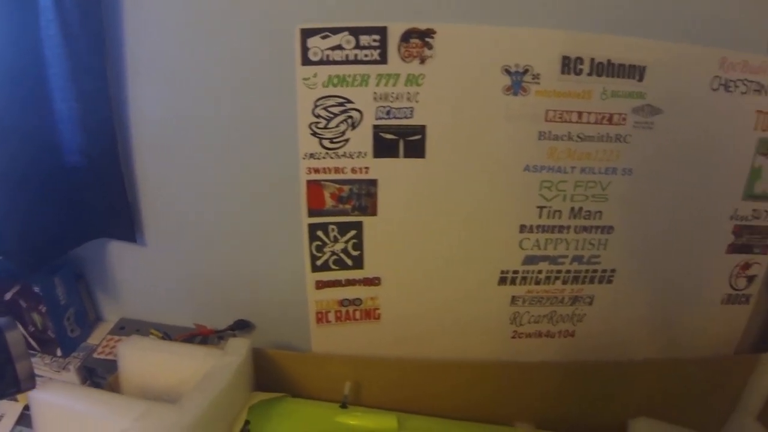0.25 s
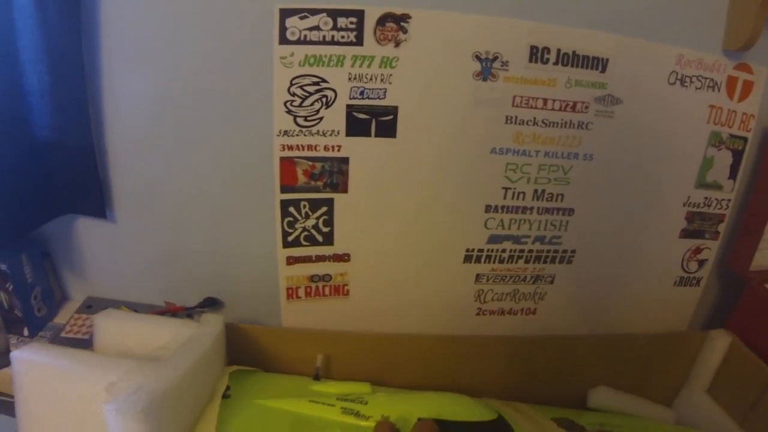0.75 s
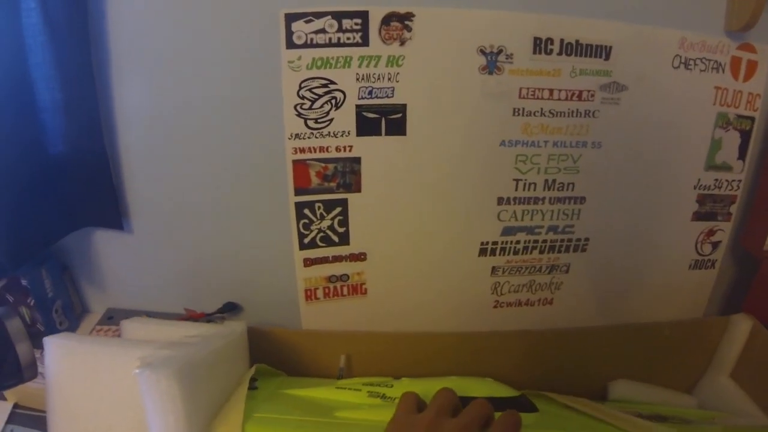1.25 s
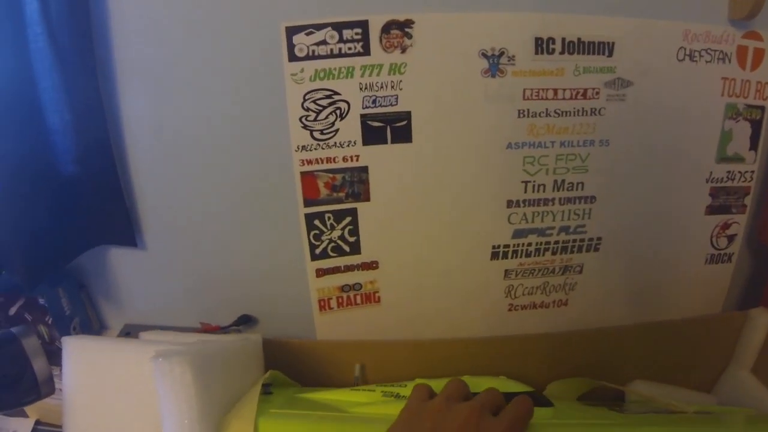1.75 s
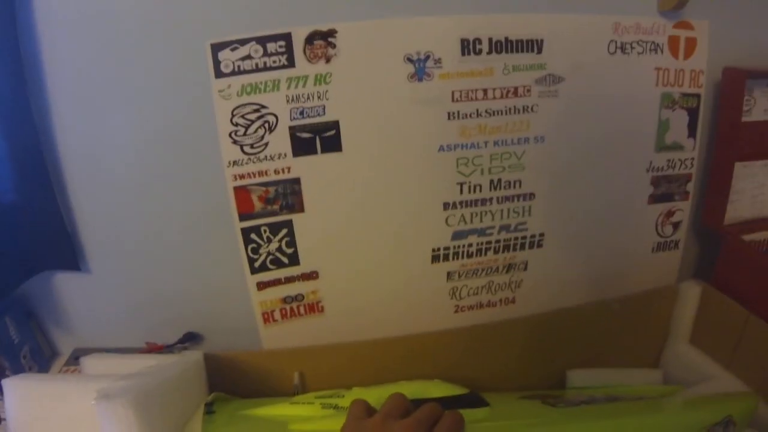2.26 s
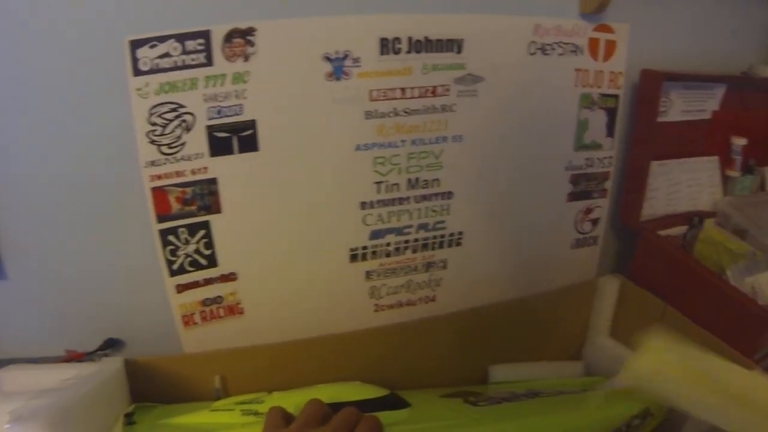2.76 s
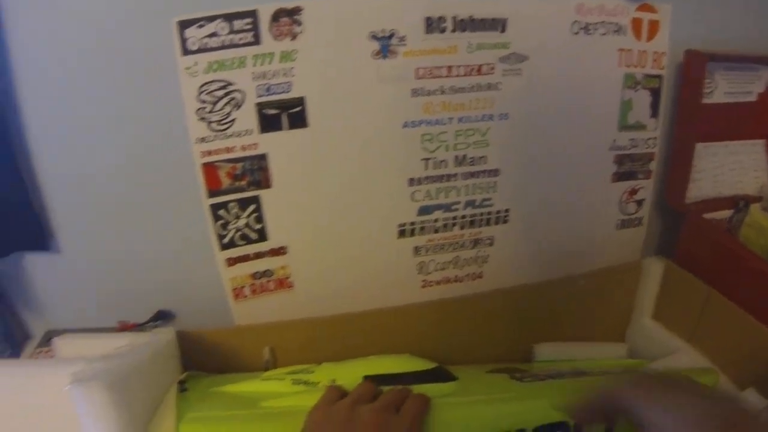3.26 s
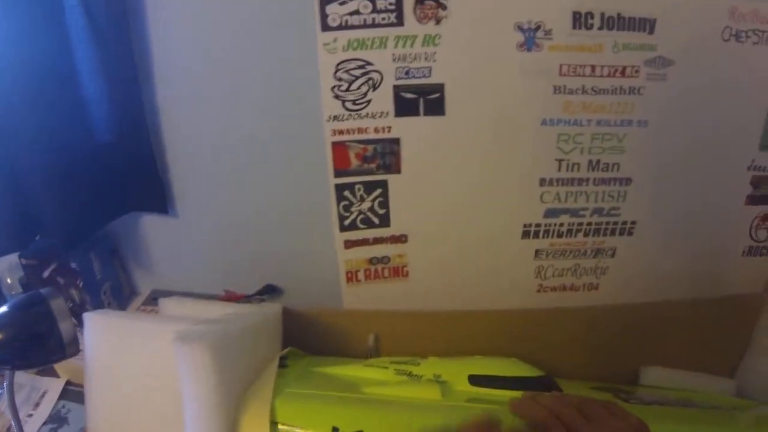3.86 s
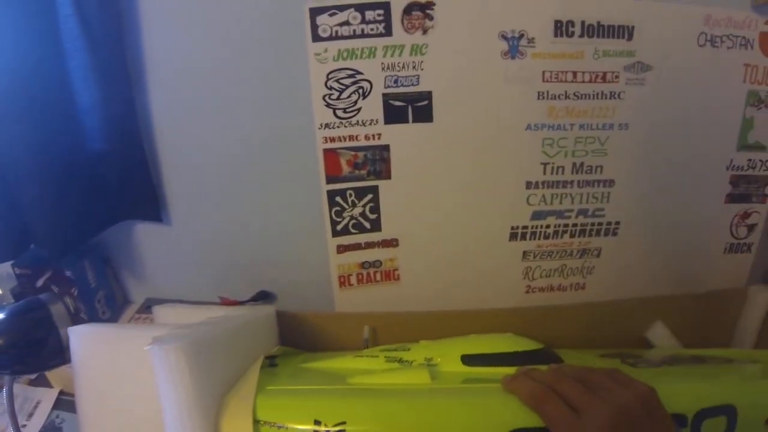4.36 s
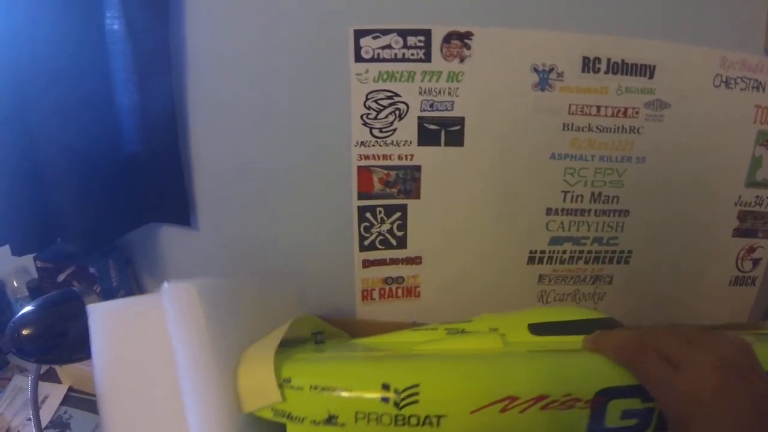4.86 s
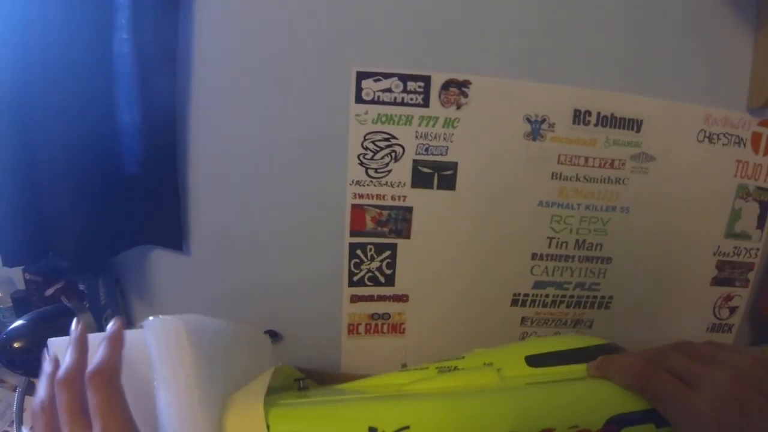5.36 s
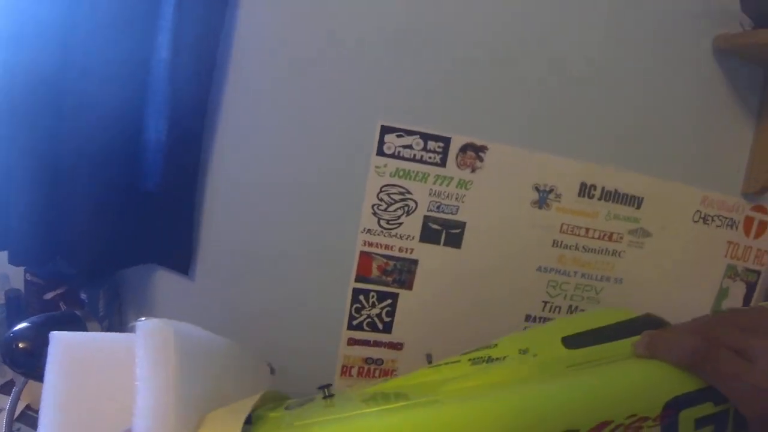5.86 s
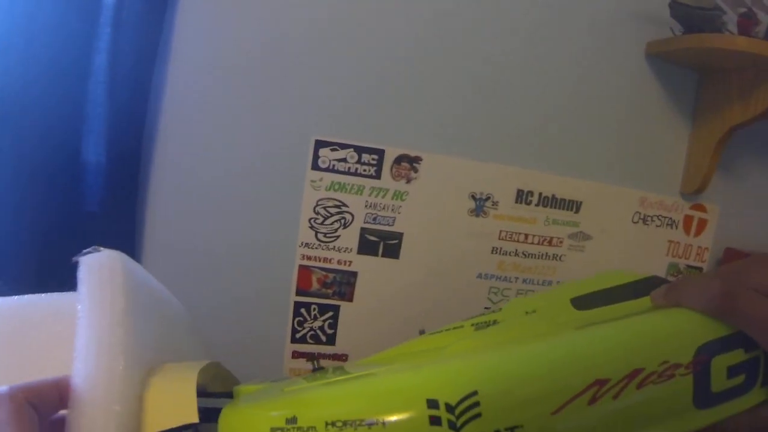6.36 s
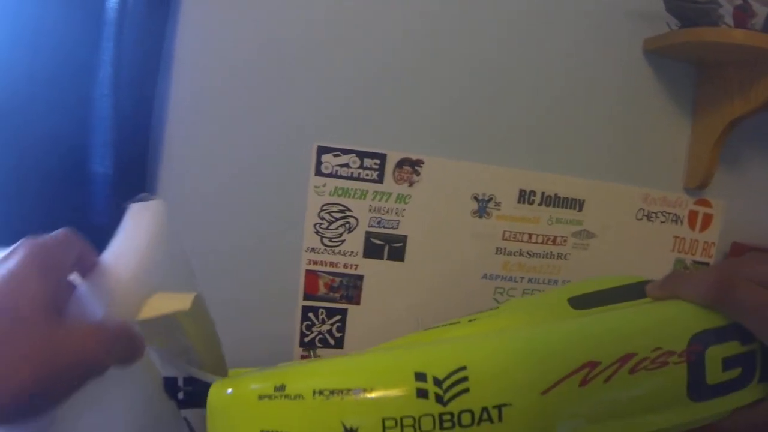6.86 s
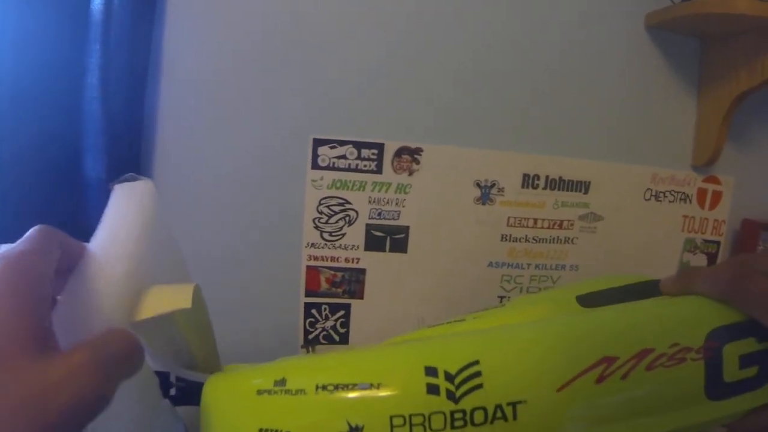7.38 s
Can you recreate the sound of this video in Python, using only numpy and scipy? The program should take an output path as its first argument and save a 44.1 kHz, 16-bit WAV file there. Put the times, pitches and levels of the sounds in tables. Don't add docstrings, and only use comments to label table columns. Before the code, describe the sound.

Irregular unpacking sounds, heard close with a short room answer: light foam cracks and box taps first, a loud double blow with scraping, a calmer spell with one soft hollow pat, a second strong clatter of box and hull, then small foam ticks and rubs. A deep table thump and a last dull knock finish it, over low room noise and very faint hum.

```python
import sys
import numpy as np
from scipy import signal
from scipy.fft import rfft, irfft, next_fast_len
from scipy.io import wavfile
from scipy.ndimage import map_coordinates

SR = 44100
rng = np.random.default_rng(int(sys.argv[2]) if len(sys.argv) > 2 else 0)


def rack_gain(trim_db):
    fader = np.asarray(trim_db, float)
    return 10 ** (fader / 20)


def to_wav(sig):
    pcm = np.clip(np.atleast_2d(sig), -1, 1) * 32767
    pcm = np.round(pcm).astype(np.int16)
    wavfile.write(sys.argv[1], SR, pcm.T)


N = 336042

# (frequency [Hz], density [dB per Hz])
FLOOR_SPECTRUM = [(12, -46), (20, 14), (53, 0.5), (162, -24), (316, -4), (634, -23.5), (709, -10.5),
                  (1200, -34), (1880, -32), (3110, -25), (5900, -34), (14400, -40.5), (15700, -54)]
# (frequency [Hz], level [dB rms])
STEADY_TONES = [
    (59.5, -54.5),
    (120, -68),
    (14750, -99),
    (14805, -88),
]
# (frequency [Hz], t60 [s])
ROOM_DECAY = [(150, 0.33), (1000, 0.23), (4000, 0.2), (12000, 0.23)]

# (frequency [Hz], width [Hz], level [dB])
TABLE_MODES = [(29.8, 18.4, 0), (64.9, 9.2, -2), (121.5, 32, -4.5)]
# (frequency [Hz], width [Hz], level [dB])
BOX_MODES = [(133.4, 31, -4.5), (206.3, 41, -8.5), (328.7, 27, -1), (439, 105, -4.5), (482, 35, 2),
             (597, 112, -1.5), (729, 163, 1), (844, 133, 1), (989, 124, 1), (1220, 700, -9.5)]
# (frequency [Hz], width [Hz], level [dB])
HULL_MODES = [(142, 21, -6.5), (464, 31, -0.5), (880, 103, -16), (1000, 45, -13.5), (1670, 82, -21),
              (2450, 120, -27), (3260, 91, -27.5), (5050, 460, -53)]
# (frequency [Hz], width [Hz], level [dB])
FOAM_MODES = [(1522, 370, -12), (1680, 142, -2.5), (1950, 715, -6.5), (2285, 215, -4.5), (3123, 780, -9.5),
              (3960, 2900, -29.5)]
# (frequency [Hz], density [dB per Hz])
BEAD_SPECTRUM = [(2470, -11), (5200, -9.5), (6040, -14), (8500, -14), (12500, -25.5), (14200, -27),
                 (15700, -33)]

# (time [s], peak level [dB], t60 [s])
THUMPS = [
    (0.272, -13.5, .1),
    (2.021, -14, .08),
    (2.059, -21, .08),
    (2.099, -13, 0.073),
    (2.118, -6.5, .08),
    (2.452, -14.5, .08),
    (4.83, -19, .07),
    (6.894, -4.5, .12),
    (7.518, -8.5, 0.153),
]
# (time [s], peak level [dB], contact t60 [s])
PATS = [
    (3.486, -15.5, 0.091),
    (3.532, -5.5, 0.049),
    (3.574, -23, 0.037),
    (3.599, -21, 0.047),
]
# (time [s], peak level [dB], pitch [Hz])
BEAD_POPS = [(0.1032, -30, 4150), (0.4609, -31, 3540), (0.874, -21, 3800), (1.204, -35, 4860),
             (1.351, -34.5, 4750), (1.4217, -38, 9250), (1.5123, -34, 3730), (1.5474, -46, 3540),
             (1.5807, -44, 3610), (1.8582, -37, 3930), (2.0208, -19, 4850), (2.0384, -25, 4800),
             (2.0474, -34, 3840), (2.1006, -17, 3520), (2.2494, -27, 3500), (2.3785, -18, 3460),
             (2.518, -18, 3540), (2.6155, -38, 3850), (2.8265, -40, 3840), (2.9821, -43, 4050),
             (3.3094, -52, 3920), (4.4588, -26, 3900), (4.7864, -29, 4910), (4.9686, -36, 3770),
             (5.0429, -36, 3580), (6.8962, -18, 3500), (7.0294, -39, 3760), (7.212, -35, 3660),
             (7.5344, -34, 3820)]

# (time [s], peak level [dB], struck pitch [Hz], hardness [dB])
PANEL_BLOWS = [(0.101, -15.5, 193, -7.5), (0.164, -28, 127, -26), (0.199, -23, 119, -9),
               (0.271, -27, 162, -28), (0.401, -21.5, 172, -10), (2.062, -12, 190, -19),
               (2.117, -11, 206, -11), (2.36, -23, 123, -29), (2.455, -14, 117, -20),
               (3.347, -25, 158, -24), (3.827, -24, 195, -14), (4.006, -41, 126, -12),
               (4.07, -21, 129, -24), (4.089, -20.5, 122, -25), (4.346, -31, 117, -25),
               (4.457, -18.5, 119, -5), (4.817, -5, 144, -20), (4.878, -12.5, 148, -39),
               (4.918, -18, 133.4, -24), (7.01, -28, 142, -20), (6.805, -33.5, 201, -29),
               (6.978, -20.5, 111, -32), (0.77, -25.5, 290, -15.5), (5.545, -28.5, 233, -15)]
# (time [s], peak level [dB], struck pitch [Hz], hardness [dB])
FLAP_BLOWS = [(0.649, -23.5, 465, -18), (0.866, -19, 597, -3), (1.505, -27, 900, -2), (1.934, -39, 550, 5),
              (2.017, -14, 303, -11), (2.032, -5, 596.5, -2.5), (2.097, -5, 437.7, -12.5),
              (2.149, -18.5, 323, -8), (2.411, -11.5, 598, -7.5), (2.514, -9.5, 482.5, -10),
              (2.86, -34.5, 920, 3), (3.018, -41.5, 974, 6), (3.086, -37.5, 370, -25),
              (4.781, -10, 640, -9), (4.839, -2.5, 466, -13), (5.216, -13, 344, -14),
              (5.407, -29, 710, -12), (5.578, -26, 560, -10), (5.676, -32.5, 880, -25),
              (5.789, -32.5, 420, -15), (6.097, -26.5, 1090, 0), (6.74, -39.5, 727, -20),
              (6.888, -10, 313, -15), (6.899, -12, 342, -14), (7.061, -25.5, 1080, -8.5),
              (7.509, -6.5, 560, -3.5)]
# (time [s], peak level [dB], struck pitch [Hz], hardness [dB])
SLIDING_BLOWS = [
    (0.34, -21.5, 327.2, -13),
    (5.04, -12, 463, -10.5),
    (5.077, -24, 305, -11),
    (6.18, -30.5, 300, -9.5),
    (7.219, -30, 517, -6),
    (4.79, -18, 766, -7),
    (4.86, -18.5, 830, -7),
    (7.512, -15, 420, -9.5),
]

# (time [s], peak level [dB], crack pitch [Hz], brightness [dB])
DULL_CRACKS = [(0.136, -20, 3000, -8), (0.4591, -18.5, 2680, -7.5), (0.5541, -20.5, 1532, -17),
               (0.61, -23, 1830, -5), (0.643, -21, 1961, -8), (1.511, -23, 1900, -15),
               (2.0218, -7, 1870, -15), (2.0366, -3.5, 1800, -27), (2.2215, -18.5, 1670, -36),
               (2.495, -33, 1680, -20), (2.614, -23, 2270, -3), (2.7886, -32, 2330, -4),
               (2.8508, -29.5, 1420, -6), (2.8632, -27, 1523, -31), (2.921, -31.5, 1960, -8),
               (3.536, -25, 1670, -29), (3.8287, -36, 1950, -24), (3.953, -31.5, 1820, -2),
               (4.814, -14, 1670, 0), (5.786, -27.5, 1310, -10), (6.1023, -16.5, 1662, -21),
               (6.189, -25, 2310, -0.5), (6.9581, -36, 1850, -19), (7.5126, -7.5, 1520, -20),
               (4.4587, -15.5, 2040, -8.5), (4.464, -11.5, 2160, -11.5), (5.0419, -20, 3164, -7)]
# (time [s], peak level [dB], crack pitch [Hz], brightness [dB])
TEARS = [(0.0167, -27.5, 1760, -9), (0.167, -22.5, 2030, -12), (0.4828, -26, 2100, -10),
         (2.0998, -8, 1961, -10.5), (2.417, -12.5, 2180, -15), (2.518, -17, 1950, -15),
         (3.3503, -34.5, 1560, 12), (3.4205, -31.5, 2304, -27), (4.039, -31.5, 1700, -10),
         (4.218, -48, 2130, -18.5), (4.7846, -15.5, 1420, -26), (4.8414, -22, 1460, -31),
         (5.044, -18.5, 1370, -8.5), (5.2182, -24, 1470, -16), (5.4098, -33.5, 2400, -6.5),
         (5.5253, -31, 1630, -25), (5.554, -26, 1800, -31), (5.726, -33, 1700, -15),
         (6.175, -32, 2200, -16.5)]
# (time [s], peak level [dB], crack pitch [Hz], bead snap level [dB])
BEAD_SNAPS = [(0.1036, -18.5, 1910, -11.5), (0.7576, -25, 1680, -9.5), (0.781, -31.5, 1860, -5),
              (0.8714, -12.5, 2210, -15), (1.204, -35.5, 1480, -13), (1.3508, -31, 2930, -2.5),
              (1.5818, -44.5, 1930, 3), (1.8087, -31, 1560, -3.5), (1.933, -20.5, 1900, -10),
              (2.019, -37, 1700, -4), (2.3796, -19.5, 2250, -7), (2.826, -44, 1290, -3),
              (2.9835, -41.5, 3300, 2.5), (4.7398, -29, 1520, -14), (6.6167, -40, 1800, -3),
              (6.836, -50, 1890, -20), (6.889, -14.5, 1680, -16), (6.898, -19.5, 2500, -3),
              (6.933, -26.5, 1410, 1), (7.014, -22, 1770, -11), (7.0643, -27, 2220, -8),
              (7.226, -32, 1680, -12), (7.2544, -36.5, 1740, -8), (7.415, -41, 1680, 0),
              (1.423, -41, 1990, 0.5), (4.5725, -48, 2000, 6), (4.6937, -36, 2000, -1),
              (5.58, -27.5, 3400, -12), (7.5343, -46, 1980, -4), (3.5306, -30.5, 2020, -4.5),
              (0.483, -19.5, 1900, -17), (0.494, -24, 2120, -24), (0.589, -26, 2297, -13),
              (6.755, -36.5, 2200, -8), (5.537, -39, 3300, -6), (5.755, -42, 3300, -12),
              (7.298, -47, 3400, -2), (7.565, -32.5, 2000, -7), (0.375, -31, 3300, -18)]

# (time of most force [s], scrape level [dB], rise [s], fall [s], box share [dB])
STROKES = [(0.049, -45, 0.26, 0.93, 3), (0.5, -41.5, 1, 0.96, 2), (0.874, -33, 0.0077, 0.068, -13),
           (0.929, -45, 0.34, 0.28, 1), (1.13, -49.5, 0.28, 0.67, 3.5), (1.73, -46.5, 0.09, 0.41, 6),
           (1.95, -46, 0.38, 0.1, -21), (2.02, -23.5, 0.021, 0.21, -5.5), (2.134, -34.5, 0.23, 0.24, 0.5),
           (2.5, -30, 0.28, .12, -2.5), (3.0, -54, 0.4, 0.99, 0), (3.36, -45.5, 0.061, 0.21, -0.5),
           (3.54, -44.5, 0.067, 0.12, -1), (3.65, -51, 0.28, 1, 6), (4.086, -41.5, 0.16, 0.15, 4.5),
           (4.55, -48, 0.8, 0.91, 3.5), (4.844, -32.5, 0.21, 0.12, 4), (5.05, -50.5, .02, 1, 4.5),
           (5.43, -60, 0.048, 0.95, 8.5), (5.78, -43.5, 0.26, 0.1, -2.5), (6.115, -49.5, 0.013, 0.24, 1.5),
           (6.9, -33.5, 0.046, 0.14, 0), (7.04, -42.5, 0.12, 0.06, -11), (7.55, -49.5, 0.37, 0.76, 3.5)]
# (time of most force [s], scrape level [dB], rise [s], fall [s], fizz share [dB])
BRUSHES = [(6.84, -44, 0.16, 0.25, -1), (6.9, -47, 0.024, 0.35, 6.5), (5.76, -48, 0.18, .1, -10),
           (2, -41, 0.18, 0.11, 0), (5.56, -43.5, 0.056, 0.16, -8), (5.93, -50.5, .06, 0.093, 0),
           (0.23, -39, 0.17, 0.17, -2), (2.49, -45, .1, 0.18, 4), (2.45, -41, 0.12, 0.19, 8.5),
           (1.6, -51.5, 0.11, .1, -9), (4.3, -50.5, .1, 0.066, 0), (0.78, -48.5, 0.23, 0.36, -7),
           (4.74, -45, 0.18, 0.093, -5), (6.35, -57, 0.1, 0.28, -3), (5.8, -48, 0.085, 0.062, -1)]
# (time of most load [s], shake level [dB], rise [s], fall [s])
LEANS = [(0.17, -28.5, 0.19, 0.31), (0.3, -32.5, .08, 0.15), (0.9, -37, 1, 0.36), (1.5, -50, 0.71, 0.34),
         (2.02, -17.5, 0.0076, 0.28), (2.134, -22, 0.12, 0.074), (2.5, -24, 0.25, .15),
         (3.36, -38.5, 0.15, 0.13), (3.54, -31, 0.16, 0.39), (4.086, -27.5, 0.26, 0.12),
         (4.45, -39, 0.46, 0.21), (4.844, -21.5, 0.051, 0.21), (5.049, -33.5, 0.038, 0.61),
         (5.848, -40, 0.25, 0.13), (6.08, -44.5, 0.12, 0.21), (6.29, -45, 0.11, 0.15),
         (6.55, -60, 0.11, .4), (6.91, -25, 0.058, 0.23), (7.58, -27, 0.072, 0.17)]

# (frequency [Hz], width [Hz], depth [dB])
PORT_DIPS = [(2690, 470, -2.5), (4470, 410, -4), (6050, 1320, -4.5), (7530, 1000, -4), (9930, 810, -3),
             (12000, 1200, -3.5)]

FLOOR_DB, WHINE_WOBBLE_DB = -49, 2
PANEL_T60, FLAP_T60, SLIDING_T60 = 0.058, 0.075, 0.24
CRACK_T60, TEAR_T60, SNAP_T60 = 0.036, 0.13, 0.051
CRACK_BEADS_DB, TEAR_BEADS_DB, SNAP_BRIGHT_DB = -46, -21, -11
POP_T60, POP_SPREAD = 0.026, 0.37
SLOPE_DB = 20
REST_DB, REST_SHAKE_DB = -60.5, -59
FIZZ_DB, FIZZ_GROWS = -12.5, 1.1
BRUSH_SHARE_DB = -2
CLUMP_DB, GRAIN_DB, SLIDE_SHARE = 1.1, 4, 1.7
TOP_HZ = 15500


def unit(x):
    return x / np.sqrt(np.mean(x ** 2) + 1e-20)


def along(points, hz):
    f, v = np.transpose(points)
    return np.interp(np.log(hz + 1), np.log(f + 1), v)


def filtered(x, response):
    m = next_fast_len(len(x) + SR // 4)
    spectrum = rfft(x, m) * response(np.fft.rfftfreq(m, 1 / SR))
    return irfft(spectrum, m)[:len(x)]


def body(modes, top_hz):
    def response(hz):
        ring = 0
        for k, (centre, width, db) in enumerate(modes):
            damping = 1j * hz * width
            ring = ring + (-1) ** k * rack_gain(db) * damping / (centre * centre - hz * hz + damping)
        return ring / (1 + 1j * hz / top_hz) ** 2
    return response


def wobble(rate):
    knots = rng.standard_normal(int(N * rate / SR) + 4)
    return map_coordinates(knots, [np.arange(N) * rate / SR])


def swells(peak_s, peak_db, rise_s, fall_s, rest_db):
    t = np.arange(N // 64 + 2) * 64 / SR
    power = np.full(len(t), rack_gain(2 * rest_db))
    for s, db, rise, fall in zip(peak_s, peak_db, rise_s, fall_s):
        distance = np.maximum((s - t) / rise, (t - s) / fall)
        power += rack_gain(2 * (db - SLOPE_DB * distance))
    return np.interp(np.arange(N) / SR, t, 10 * np.log10(power))


def slips(rate, spread_db, slide_share):
    chance, size, glide = rng.random(N), rng.standard_normal(N), rng.standard_normal(N)
    jumps = (chance < rate / SR) * rack_gain(spread_db * np.clip(size, -2, 2)) * np.sign(glide)
    return unit(unit(jumps) + slide_share * glide)


def rattle(t60, blow, rise):
    t = np.arange(SR // 6) / SR
    chatter = rack_gain(-60 * t / t60) * (1 - np.exp(-t / rise)) * rng.standard_normal(len(t))
    return chatter - blow * np.exp(-t / 0.00012)


def add(out, s, db, sound):
    out[round(s * SR):][:len(sound)] += rack_gain(db) * sound / np.abs(sound).max()


def quiet():
    floor = rack_gain(FLOOR_DB) * unit(filtered(rng.standard_normal(N), lambda hz: rack_gain(along(FLOOR_SPECTRUM, hz))))
    t = np.arange(N) / SR
    tones = 0
    for hz, db in STEADY_TONES:
        tones = tones + rack_gain(db + 4.5 + WHINE_WOBBLE_DB * wobble(23)) * np.sin(2 * np.pi * hz * t)
    return floor + tones


def room(x):
    out, step = np.zeros(N + SR), SR // 8
    for start in range(0, N, step):
        hz, t, z = signal.stft(rng.standard_normal(SR // 3), SR, nperseg=256)
        decay = rack_gain(-60 * t / along(ROOM_DECAY, hz)[:, None])
        tail = signal.istft(z * decay, SR, nperseg=256)[1]
        answer = signal.fftconvolve(x[start:start + step], tail / np.linalg.norm(tail))
        out[start + 120:][:len(answer)] += answer
    return out[:N]


def thumps():
    out, t = np.zeros(N + SR), np.arange(SR // 4) / SR
    for s, db, t60 in THUMPS:
        add(out, s + 0.0061, db - 7, rack_gain(-60 * t / t60) * np.sin(2 * np.pi * 34 * t))
    return out[:N]


def pats():
    out = np.zeros(N + SR)
    for s, db, t60 in PATS:
        force = rattle(t60, blow=0.068, rise=0.0066)
        add(out, s, db - 0.3, filtered(force, body(HULL_MODES, top_hz=6000)))
    return out[:N]


def bead_pops():
    out = np.zeros(N + SR)
    for s, db, hz in BEAD_POPS:
        force = rattle(POP_T60, blow=1.3, rise=0.0002)
        add(out, s, db - 3.5, filtered(force, body([(hz, POP_SPREAD * hz, 0)], top_hz=7500)))
    return out[:N]


def knocks():
    out = np.zeros(N + SR)
    blows = [(*row, PANEL_T60) for row in PANEL_BLOWS]
    blows += [(*row, FLAP_T60) for row in FLAP_BLOWS]
    blows += [(*row, SLIDING_T60) for row in SLIDING_BLOWS]
    for s, db, hz, hard_db, t60 in blows:
        uneven_db = rng.normal(0, 2.2, len(BOX_MODES))
        struck = [(c, w, g + r + (hard_db + 7) * (c > 550)) for (c, w, g), r in zip(BOX_MODES, uneven_db)]
        struck = sorted(struck + [(hz, 95, 5.5)])
        force = rattle(t60, blow=5.8 * rack_gain(0.46 * hard_db), rise=0.0002 * rack_gain(-1.2 * hard_db))
        add(out, s + 0.0045, db - 0.3, filtered(force, body(struck, top_hz=1700)))
    return out[:N]


def cracks():
    out = np.zeros(N + SR)
    breaks = [(*row, CRACK_BEADS_DB, CRACK_T60) for row in DULL_CRACKS]
    breaks += [(*row, TEAR_BEADS_DB, TEAR_T60) for row in TEARS]
    breaks += [(s, db, hz, SNAP_BRIGHT_DB, snap_db, SNAP_T60) for s, db, hz, snap_db in BEAD_SNAPS]
    for s, db, hz, bright_db, snap_db, t60 in breaks:
        uneven_db = rng.normal(0, 2.76, len(FOAM_MODES))
        spot = [(c, 1.7 * w, g + r + (bright_db + 11.5) * (c > 2200))
                for (c, w, g), r in zip(FOAM_MODES, uneven_db)]
        spot = sorted(spot + [(hz, 600, 2.5)])
        top_hz = 4500 * rack_gain(0.35 * (bright_db + 16.5))
        force = rattle(t60, blow=2.55, rise=0.00031)
        add(out, s, db - 0.3, filtered(force, body(spot, top_hz)))
        snap = rattle(1.5 * t60, blow=0.31, rise=0.00014)
        add(out, s, db + snap_db - 0.3, filtered(snap, lambda f: rack_gain(along(BEAD_SPECTRUM, f))))
    return out[:N]


def rubs():
    moves = [(*row, 0) for row in STROKES]
    moves += [(*row[:4], BRUSH_SHARE_DB, row[4]) for row in BRUSHES]
    s, force_db, rise, fall, share_db, bright_db = np.transpose(moves)
    scrape_db = swells(s, force_db, rise, fall, REST_DB)
    drag_db = swells(s, force_db + share_db, rise, fall, REST_DB + 3)
    beads_db = swells(s, force_db + bright_db, rise, fall, REST_DB)
    fizz_db = FIZZ_DB + beads_db.max() + FIZZ_GROWS * (beads_db - beads_db.max())
    shake_db = swells(*np.transpose(LEANS), REST_SHAKE_DB)

    clumps = CLUMP_DB * wobble(45)
    table = unit(filtered(rng.standard_normal(N), body(TABLE_MODES, top_hz=313)))
    box = filtered(slips(400, 4.5, slide_share=4), body(BOX_MODES, top_hz=1630))
    box = unit(rack_gain(clumps + 1.85 * wobble(25)) * box)
    foam = filtered(slips(600, GRAIN_DB, SLIDE_SHARE), body(FOAM_MODES, top_hz=3580))
    foam = unit(rack_gain(clumps + 1.24 * wobble(15)) * foam)
    fizz = filtered(slips(440, GRAIN_DB, SLIDE_SHARE), lambda hz: rack_gain(along(BEAD_SPECTRUM, hz)))
    fizz = unit(rack_gain(clumps + wobble(18)) * fizz)
    return rack_gain(shake_db) * table + rack_gain(drag_db + 2.5) * box + rack_gain(scrape_db + 1) * foam + rack_gain(fizz_db + 5) * fizz


def scene():
    hits = knocks() + cracks() + pats() + thumps() + bead_pops()
    return (rubs() + hits + rack_gain(-9) * room(hits) + quiet())[None]


def housing(hz):
    response = 1
    for centre, width, db in PORT_DIPS:
        stiffness, damping = centre * centre - hz * hz, 1j * hz * width
        response = response * (stiffness + damping * rack_gain(db)) / (stiffness + damping)
    return response * (hz < TOP_HZ)


def low_pass(x):
    return signal.sosfilt(signal.butter(12, 15810, fs=SR, output="sos"), x)


def record(dry):
    mix = filtered(dry[0], housing)[None]
    return low_pass(mix)


dry = scene()
out = record(dry)
to_wav(out)
```